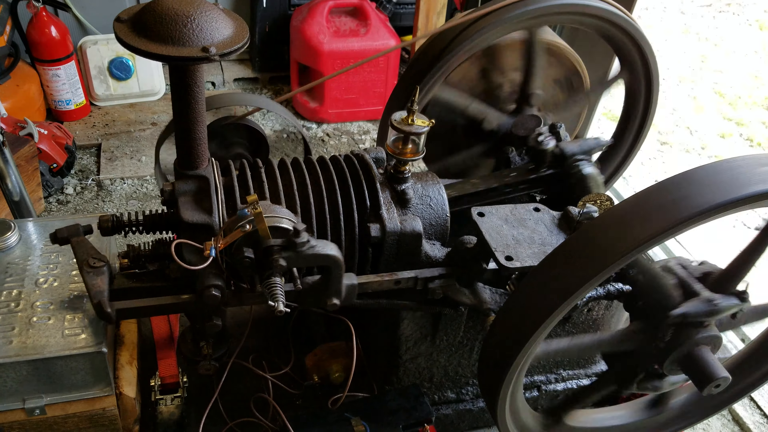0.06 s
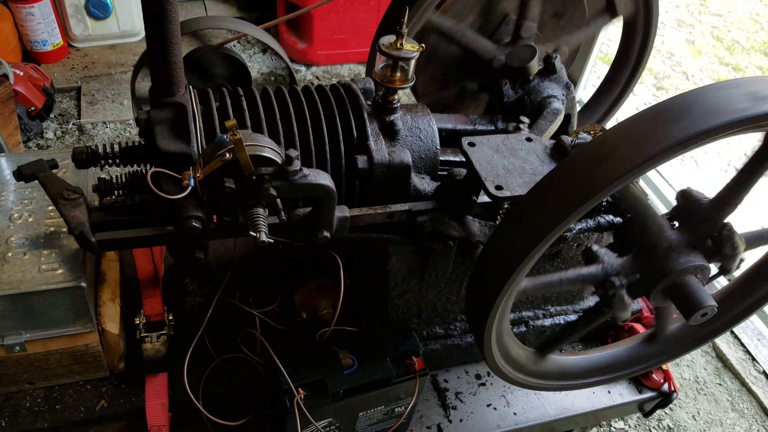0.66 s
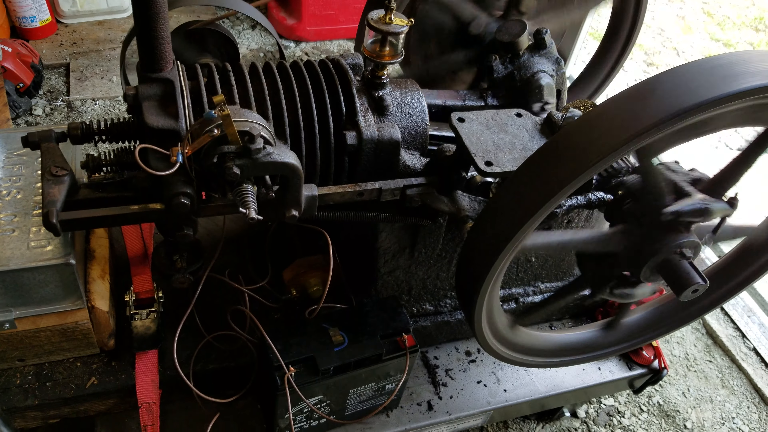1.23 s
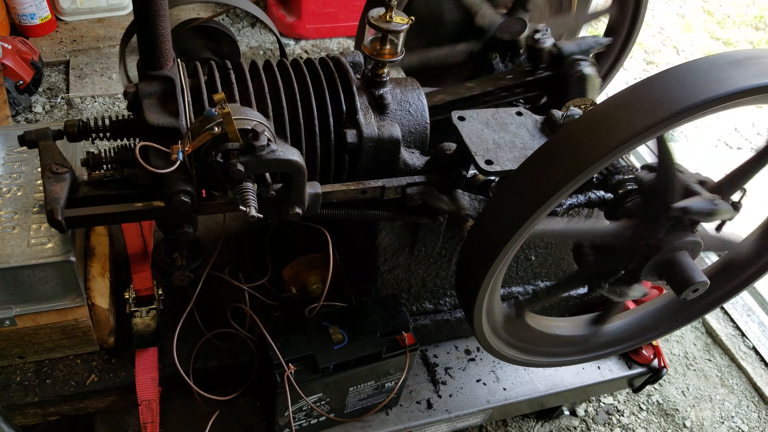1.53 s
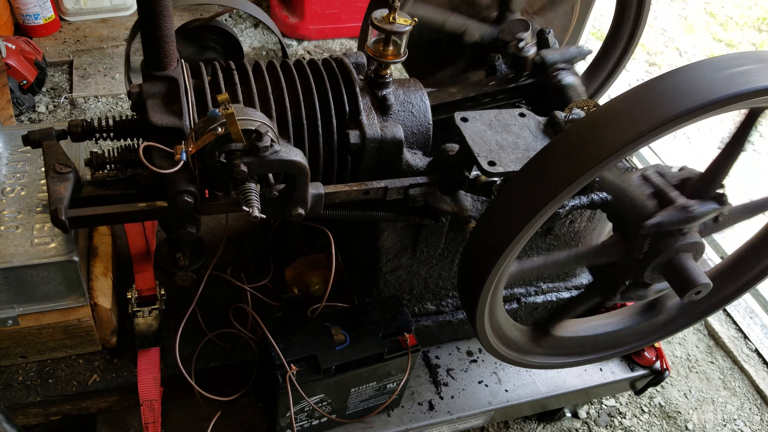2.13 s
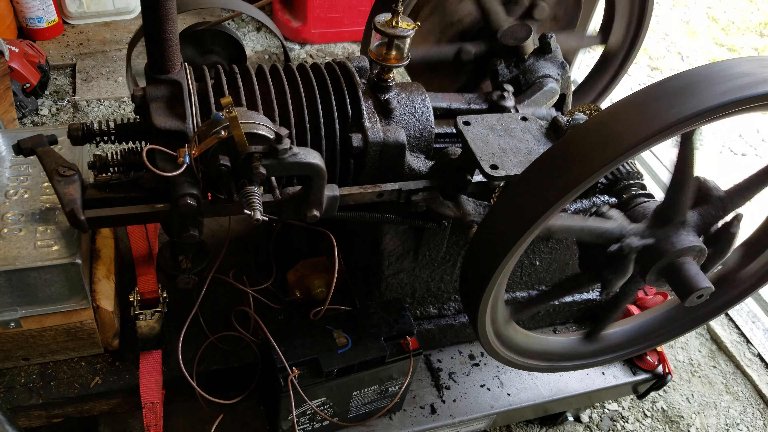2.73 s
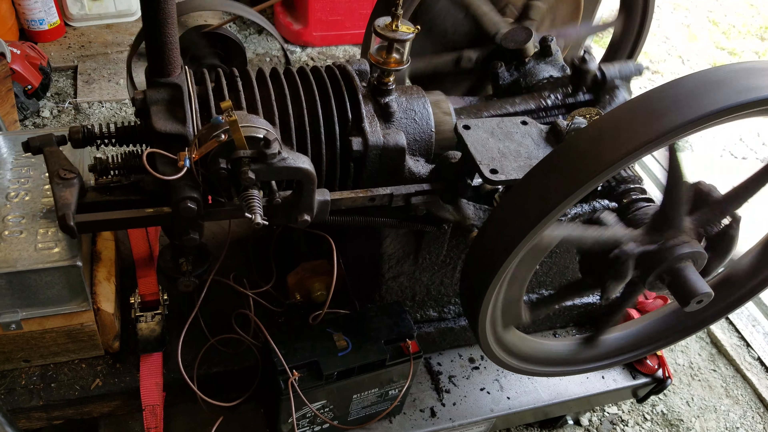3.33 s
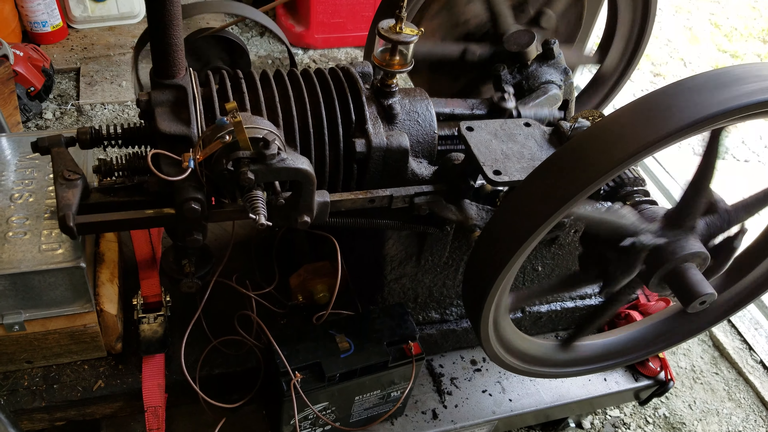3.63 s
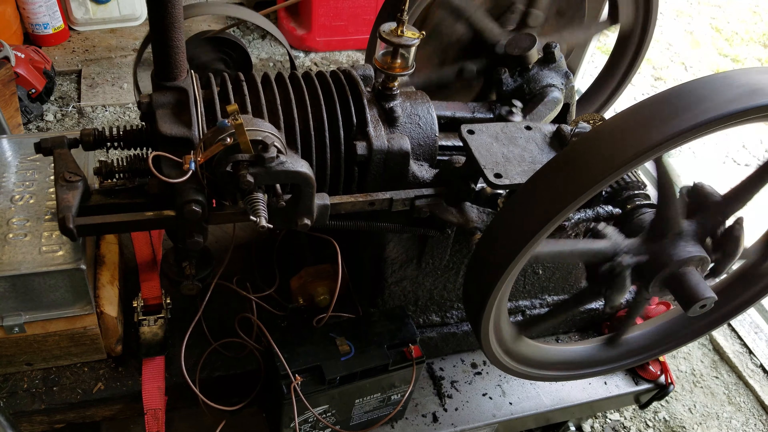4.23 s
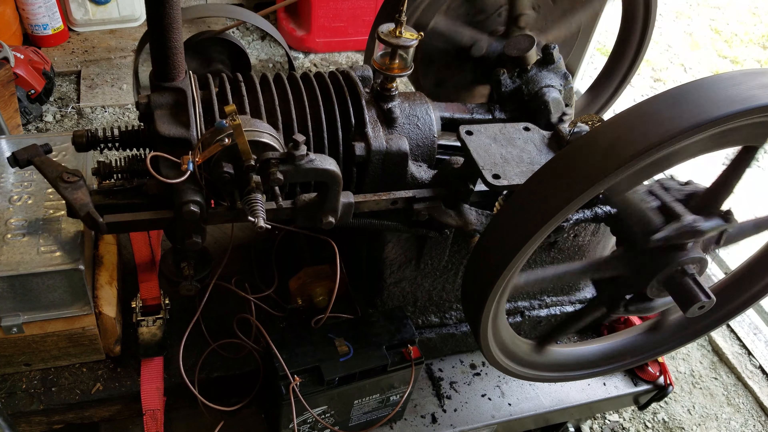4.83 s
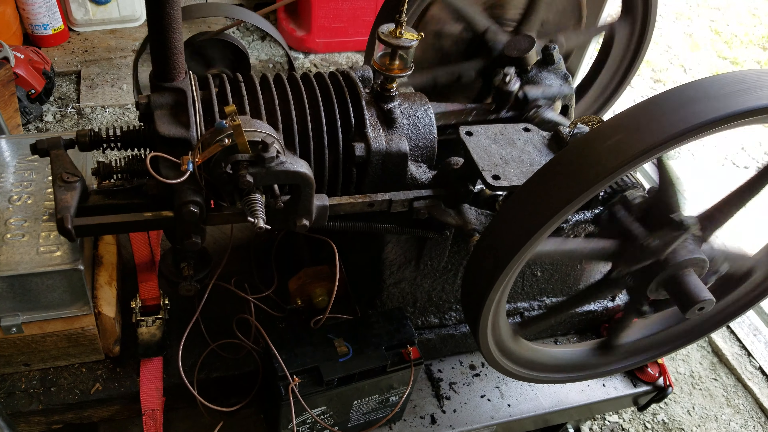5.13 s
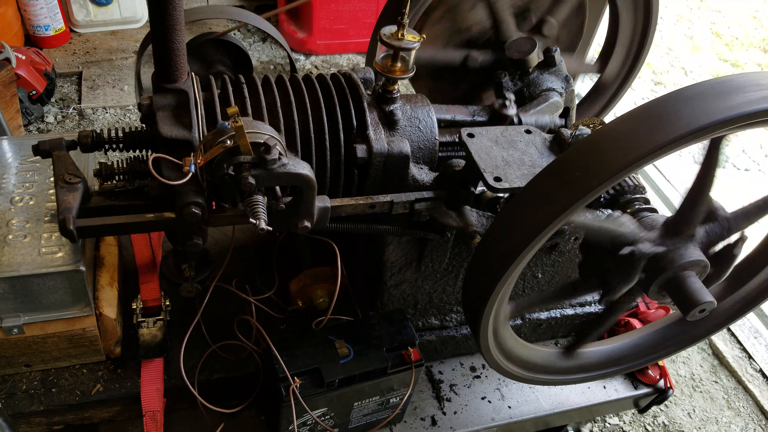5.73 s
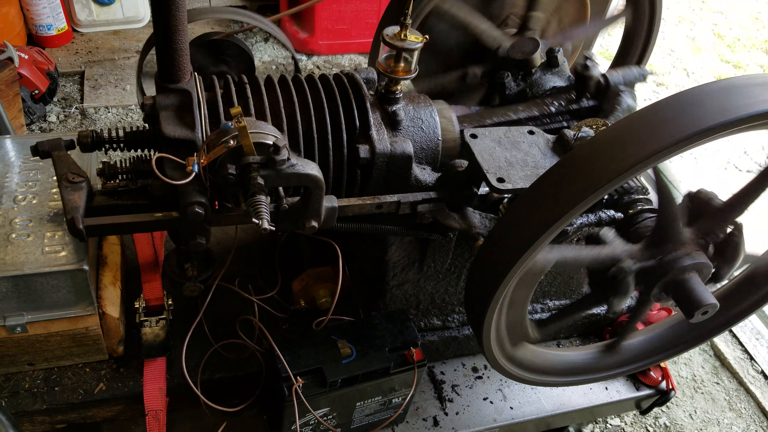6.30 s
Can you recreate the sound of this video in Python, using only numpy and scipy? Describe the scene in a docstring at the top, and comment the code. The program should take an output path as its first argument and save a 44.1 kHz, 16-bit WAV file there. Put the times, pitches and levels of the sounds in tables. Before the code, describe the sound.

Close to an old stationary engine in an open shed, a push rod clacks a little over twice a second above a low iron rumble. The intake snorts and hisses, one charge merely puffs out, then the next fires with a thump and a bark. The engine coasts with bright metal pings and small ticks, then fires three more times at shortening gaps, the clatter continuing throughout.

```python
"""A single-cylinder hit-and-miss engine in an open shed, on a stereo microphone close by.
Gears rumble from the start and the push rod clacks once every two turns. The intake valve snorts, but
the squeezed charge only puffs out; the next catches at 0.8 s, so the cylinder thumps and the pipe barks.
The engine coasts, its cam striking the latched rod, then misses and fires again at 3.3 s.
Two more snorts, near 4.7 s and 6 s, each lead to a bark, with coasting in between."""
import sys
import numpy as np
from scipy import signal
from scipy.fft import rfft, irfft, next_fast_len
from scipy.io import wavfile
from scipy.ndimage import map_coordinates

SR = 44100
rng = np.random.default_rng(int(sys.argv[2]) if len(sys.argv) > 2 else 0)


def dump_mix(stems):
    """Bounce the given channels to the path in sys.argv[1] as a 16-bit WAV at rate SR."""
    frames = np.atleast_2d(stems).T  # one column per channel
    limited = np.clip(frames, -1, 1)  # hard clip at full scale
    pcm = np.round(limited * 32767).astype(np.int16)
    wavfile.write(sys.argv[1], SR, pcm)


N = 289296
AGE = np.arange(SR // 4) / SR  # time since a blow [s]
SWELL_LEAD_S = .1


def amp(db):
    """Decibels to gain."""
    return 10 ** (np.asarray(db) / 20)


def unit(x):
    """Scaled to rms 1."""
    return x / np.sqrt(np.mean(x ** 2) + 1e-20)


def along(points, hz):
    """(frequency, value) points read on a log axis."""
    freqs, values = np.transpose(points)
    return np.interp(np.log(hz + 1), np.log(freqs + 1), values)


def wobble(rate, size=N):
    """A smooth random curve, rate knots a second."""
    knots = rng.standard_normal(int(size * rate / SR) + 4)
    return map_coordinates(knots, [np.arange(size) * rate / SR])


def filtered(x, response):
    """x shaped by a gain that depends on frequency."""
    size = x.shape[-1]
    padded = next_fast_len(size + 4096)
    return irfft(rfft(x, padded) * response(np.fft.rfftfreq(padded, 1 / SR)), padded)[..., :size]


def add(track, s, sound):
    """Mix a sound into the track at time s."""
    start = max(round(s * SR), 0)
    track[..., start:start + sound.shape[-1]] += sound[..., :N - start]


def train(times, levels_db, shape):
    """One shape repeated at each time and level."""
    out = np.zeros(N)
    for s, db in np.broadcast(times, levels_db):
        add(out, s, amp(db) * shape)
    return out


def fade(attack, t60):
    """The envelope of a blow."""
    return (1 - np.exp(-AGE / attack)) * amp(-60 * AGE / t60)


def hump(width_s):
    """A smooth swell that peaks SWELL_LEAD_S after it starts."""
    return np.exp(-((AGE - SWELL_LEAD_S) / width_s) ** 2)


def flow(times, levels_db, holds, rise, fall, sag=0):
    """Gain of an air flow that rises to each peak, sags while it holds, then falls (slopes in dB/s)."""
    out = np.zeros(N)
    for s, db, hold in np.broadcast(times, levels_db, holds):
        age = np.arange(N) / SR - s
        near = abs(age) < .35
        age = age[near]
        drop_db = sag * np.clip(age, 0, hold) + fall * np.maximum(age - hold, 0)
        out[near] += amp(db + rise * np.minimum(age, 0) - drop_db)
    return out


# how alike the microphone's two sides are: (frequency [Hz], correlation [0-1])
LIKENESS = [(100, 0.9), (280, 0.9), (500, 0.93), (1000, 0.1), (4000, 0), (14000, 0.07)]
def spread(hz):
    """The angle that sets left and right apart: small in the bass, wide in the treble."""
    return np.arccos(along(LIKENESS, hz)) / 2


def rush(spectrum, resonances=(), ripple_db=3.6):
    """Stereo noise of rms 1, lifted at resonances; close modes and shed echoes ripple each side."""
    def gain(hz):
        lift = sum(db / (1 + (2 * (hz - centre) / width) ** 2) for centre, width, db in resonances)
        return amp(along(spectrum, hz) + lift) * [np.cos(spread(hz)), np.sin(spread(hz))]

    def ripple(hz):
        grid = np.arange(0, SR / 2, 55)
        depth = ripple_db * np.minimum(grid / 2500, 1)
        return amp([np.interp(hz, grid, depth * rng.standard_normal(len(grid))) for side in "LR"])
    mid, side = filtered(rng.standard_normal((2, N)), gain)
    return unit(filtered(np.array([mid + side, mid - side]), ripple))


def ring(times, levels_db, modes, attack, waver_rad=.55):
    """Modes struck at new strengths by each blow; high ones reach the two sides out of step."""
    out = np.zeros((2, N))
    for s, blow_db in zip(times, levels_db):
        for hz, db, t60 in modes:
            chance_db = 1.2 * rng.standard_normal()
            apart = spread(hz) * rng.choice([-1, 1]) * np.array([[1], [-1]])
            phase = 2 * np.pi * hz * AGE + apart + waver_rad * wobble(90, size=len(AGE))
            add(out, s, amp(blow_db + db + chance_db) * fade(attack, t60) * np.sin(phase))
    return out


# how loudly gears and bearings run: (time [s], level [dB])
RUNNING_LEVEL = [(0.0, -29), (0.2, -33.5), (0.77, -34.5), (0.86, -31.5), (1.31, -33), (1.42, -33),
                 (1.94, -34.5), (2.56, -23.5), (2.79, -35.5), (2.98, -30.5), (3.07, -34), (3.84, -34.5),
                 (4.55, -35), (4.8, -29.5), (4.93, -35), (5.24, -36), (6.21, -39), (6.56, -34)]
def running_db(times):
    """The running level at these moments."""
    return np.interp(times, *np.transpose(RUNNING_LEVEL))


# spectra of the low rumble and the gear teeth: (frequency [Hz], level [dB])
RUMBLE_SPECTRUM = [(20, -46), (60, -18), (110, -22.5), (150, -13.5), (200, 2), (300, -8.5), (470, -6),
                   (600, -28), (1000, -50.5)]
TEETH_SPECTRUM = [(260, -11.5), (450, -14), (660, -2), (1150, -2.5), (1800, -7.5), (2500, -6.5),
                  (3500, -20.5), (4900, -13.5), (7200, -20), (8700, -29), (12000, -30.5), (16000, -35)]
# resonances of the iron casting: (frequency [Hz], width [Hz], lift [dB])
IRON = [(221.7, 13.6, 12.5), (276, 12, 8), (368.6, 13.5, 14), (456.5, 65, 6.5), (645.5, 8.5, 11.5),
        (1250, 48, 4.5), (1327, 16, 4.5), (2390, 24, 5.5), (4970, 350, 1.5)]
def gears():
    """Meshing teeth and sliding bearings keep the casting rumbling and rasping."""
    rumble = amp(-2.5 + 2 * wobble(25)) * rush(RUMBLE_SPECTRUM, IRON)
    roughness = unit(amp(3 * wobble(30) + 0.88 * wobble(350)))
    teeth = amp(-4) * roughness * rush(TEETH_SPECTRUM, IRON)
    return amp(running_db(np.arange(N) / SR)) * (rumble + teeth)


# spectra of a steel click and the linkage's clang: (frequency [Hz], level [dB])
CLICK_SPECTRUM = [(500, -49), (2500, -27), (5500, 16.5), (8500, 1.5), (11500, 6.5), (16000, 2)]
LINKAGE_SPECTRUM = [(200, -17), (450, 2), (800, 4), (1350, 6.5), (1700, 3), (2400, 5.5), (3300, 1.5),
                    (5800, 2), (7000, -2.5), (8500, -13), (11000, -7), (16000, -22)]
def clack(s, click_db, clang_db):
    """Steel on steel: a hard click and a clang of the linkage."""
    click = train(s, click_db - 9, fade(attack=0.00022, t60=0.026)) * rush(CLICK_SPECTRUM)
    clang_gain = train(s, clang_db + 0.5, fade(attack=0.0013, t60=0.2))
    return click + clang_gain * rush(LINKAGE_SPECTRUM, ripple_db=2.5)


# the push rod drops back, once every two turns: (time [s], click level [dB], clang level [dB])
ROD_DROPS = [(0.0004, -0.5, -16), (0.4584, -1.5, -15), (0.9107, -27, -20), (1.29, -10.5, -21),
             (1.6886, -10, -21), (2.098, -2.5, -17), (2.5262, -2, -13.5), (2.9882, -3, -15.5),
             (3.4492, -25, -20.5), (3.844, -17, -21.5), (4.2567, -7, -22.5), (4.6851, -1, -15),
             (5.1217, -27, -24), (5.532, -10, -23.5), (5.9583, -9, -21), (6.3827, -21, -25)]
# modes of the rod and the frame: (frequency [Hz], level [dB], t60 [s])
ROD_MODES = [(653.5, 2, 0.11), (898, -8.5, 0.26), (1020, -7, .1), (1330, -2, 0.15), (1358, 2, 0.22),
             (1770, -18, 0.15), (4370, -3, 0.17)]
FRAME_MODES = [(227.3, -2, 0.13), (287, -8.5, 0.2), (371.7, -1, 0.22), (452, -6.5, 0.11)]
def push_rod():
    """Each drop clacks and thuds the frame; hard ones also ring the rod."""
    s, click_db, clang_db = np.transpose(ROD_DROPS)
    rod = ring(s, 4 + 1.62 * clang_db, ROD_MODES, attack=0.0024)
    thud = ring(s, clang_db, FRAME_MODES, attack=0.0029, waver_rad=0.49)
    return clack(s, click_db, clang_db) + rod + thud


# the intake valve snorts: (time [s], level [dB], pitch [Hz], click level [dB])
VALVE_SNORTS = [(0.045, -10.5, 292, -4), (2.575, -9.5, 291, -2), (4.719, -12.5, 284, -6),
                (5.988, -19, 308, -7.5)]
def intake_valve():
    """The valve flutters on its spring, then hits its stop."""
    flutter = np.zeros(N)
    swell = (1 - np.exp(-AGE / 0.00072)) * np.exp(-(AGE / 0.017) ** 3)
    for s, db, hz, _ in VALVE_SNORTS:
        phase = 2 * np.pi * hz * AGE + 0.4 * wobble(120, size=len(AGE))
        buzz = np.sin(phase) + amp(-24) * np.sin(2 * phase) + amp(-18) * np.sin(3 * phase)
        add(flutter, s, amp(db + 0.5) * swell * buzz)
    s, db, _, click_db = np.transpose(VALVE_SNORTS)
    return flutter + clack(s + .031, click_db, clang_db=db - 3.5)


# spectrum of air in an oily gap: (frequency [Hz], level [dB])
FIZZ_SPECTRUM = [(3000, -25), (6000, -6), (7300, 2.5), (8600, -2), (11000, 1), (14000, 0.5), (16000, -3.5)]
def fizz():
    """Air spits through an oily gap in tiny bursts."""
    return rush(FIZZ_SPECTRUM, ripple_db=2) * unit(amp(2.2 * wobble(900) + 2.2 * wobble(110)))


# suction strokes: (time of full flow [s], hold [s], rasp level [dB], fizz level [dB])
SUCTION_STROKES = [(0.077, 0.049, -19, -28.5), (0.523, 0.08, -22, -29.5), (2.606, 0.056, -18, -28.5),
                   (3.052, .085, -24, -30.5), (4.754, 0.058, -20, -29), (6.021, 0.057, -26.5, -34.5)]
# spectrum of air in the mixer: (frequency [Hz], level [dB])
MIXER_SPECTRUM = [(22, -47), (45, -8), (115, -22), (200, -3), (310, -4.5), (430, -3), (700, -11),
                  (1100, -6), (1500, -10.5), (2600, -6.5), (4300, -6), (6000, -7.5), (8300, -29),
                  (16000, -36)]
# resonances of its throat: (frequency [Hz], width [Hz], lift [dB])
MIXER_THROAT = [(219, 38, 7.8), (281, 18, 16.7), (369.5, 6.4, 19), (660, 45, 3.1), (1260, 59, 5.5),
                (1730, 68, 6.3), (2400, 300, 3.3), (4370, 120, 3.3), (5900, 170, 5), (6230, 77, 3.8)]
def suction():
    """Air drawn through the mixer fizzes first, then rasps."""
    s, hold, rasp_db, fizz_db = np.transpose(SUCTION_STROKES)
    lead_s = 0.016
    fizz_gain = flow(s - lead_s, fizz_db + 1.5, hold + lead_s, rise=475, fall=335)
    rasp_gain = flow(s, rasp_db + 3.5, hold, rise=475, fall=335, sag=61)
    rasp = rush(MIXER_SPECTRUM, MIXER_THROAT, ripple_db=2.5) * unit(amp(1.4 * wobble(700) + wobble(120)))
    return rasp_gain * rasp + fizz_gain * fizz()


# sharp ticks of the governor and valve gear: (time [s], level [dB])
SHARP_TICKS = [(0.1224, -20), (0.2498, -23), (0.3227, -20), (0.3461, -12), (0.5247, -10), (0.684, -27),
               (1.557, -22.5), (1.8118, -18.5), (2.0727, -19.5), (2.34, -19), (2.8524, -18), (3.0565, -9.5),
               (3.2116, -14), (3.7354, -21), (4.52, -18.5), (5.5932, -20.5)]
# spectrum of small loose parts: (frequency [Hz], level [dB])
TINKLE_SPECTRUM = [(500, -22), (2000, -3), (4500, -1.5), (7000, 4), (8500, -9.5), (12000, -1),
                   (16000, -0.5)]
def clatter(faint_per_s=2, faint_db=-29):
    """Loose small parts tick, some sharply and others faintly at random."""
    faint = [(s, faint_db) for s in rng.uniform(0, N / SR, round(faint_per_s * N / SR))]
    s, db = np.transpose(list(SHARP_TICKS) + faint)
    click = train(s, db - 9, fade(attack=.0002, t60=.009)) * rush(CLICK_SPECTRUM)
    steel = rush(TINKLE_SPECTRUM, ripple_db=3.5)
    return click + train(s, db - 10.5, fade(attack=0.00077, t60=0.19)) * steel


# compression peaks: (time [s], rasp level [dB], fizz level [dB])
COMPRESSIONS = [(0.258, -24.5, -30.5), (0.738, -25.5, -30.5), (2.785, -24, -31.5), (3.277, -25.5, -31),
                (4.942, -26, -31.5), (6.214, -31.5, -35.5)]
# spectrum of gas passing the rings: (frequency [Hz], level [dB])
LEAK_SPECTRUM = [(70, -39), (120, -21), (240, -2.5), (570, -13), (1200, -10), (1800, -12), (2800, -12),
                 (4900, -11), (7200, -21), (9000, -25), (16000, -55)]
def gas_leak():
    """Gas hisses past the rings when squeezed or burning, and out of the exhaust after a miss."""
    peaks = [(s, 0, rasp_db, fizz_db) for s, rasp_db, fizz_db, *_ in list(COMPRESSIONS) + list(MISSES)]
    peaks += [(s + .02, 0.016, db - 17.5, db - 40) for s, db in IGNITIONS]
    s, hold, rasp_db, fizz_db = np.transpose(peaks)
    rasp = rush(LEAK_SPECTRUM, IRON, ripple_db=3.2) * unit(amp(1.05 * wobble(500)))
    rasp_gain = flow(s, rasp_db + 4.5, hold, rise=492, fall=285)
    fizz_gain = flow(s, fizz_db + 3, hold, rise=492, fall=285)
    return rasp_gain * rasp + fizz_gain * fizz()


def before_cam(turns):
    """The times so many crank turns before each cam strike; rod drops are two turns apart."""
    drop_s = np.transpose(ROD_DROPS)[0]
    drop_turns = 2 * np.arange(len(drop_s))
    strike_turns = np.interp(np.transpose(CAM_STRIKES)[0], drop_s, drop_turns)
    return np.interp(strike_turns - turns, drop_turns, drop_s)


# the bearings knock under load: (time [s], level [dB])
LOAD_KNOCKS = [(0.343, -17), (0.564, -14), (0.739, -24), (3.09, -12), (3.27, -14)]
def bearings():
    """Bearing play knocks the frame at one crank angle of each coasting cycle, and harder under load."""
    knock = fade(attack=0.0011, t60=0.13)
    coast_s = before_cam(turns=.626)
    coasting = train(coast_s, running_db(coast_s) + 3, knock)
    load_s, load_db = np.transpose(LOAD_KNOCKS)
    loaded = train(load_s, load_db - 10.5, knock)
    return (coasting + loaded) * rush(RUMBLE_SPECTRUM, IRON)


# charges that do not catch: (time [s], rasp level [dB], fizz level [dB], thump level [dB])
MISSES = [(0.352, -28.5, -33.5, -22), (2.88, -28, -26.5, -23)]
def misfires(thump_hz=286.3):
    """An unburnt charge leaves the pipe with a soft, hollow thump."""
    s, _, _, thump_db = np.transpose(MISSES)
    tone = np.sin(2 * np.pi * thump_hz * AGE + 0.51 * wobble(144, size=len(AGE)))
    return train(s - SWELL_LEAD_S, thump_db, hump(width_s=0.013) * tone)


# coasting rubs, over the running level: (lead on the cam [turns], swish level [dB], squeak level [dB])
PISTON_RUBS = [(0.66, 1.5, -4.5), (0.2, -6.5, -8.5)]
# spectra of the piston's swish and the rings' squeak: (frequency [Hz], level [dB])
SWISH_SPECTRUM = [(200, -9), (450, -6.5), (700, 6), (1200, 5), (1700, -3.5), (2400, -3), (3300, -6.5),
                  (6000, -40), (16000, -34)]
SQUEAK_SPECTRUM = [(2000, -10), (3900, -29), (4600, -3.5), (5200, -3), (6000, -12), (9000, -18),
                   (16000, -20)]
def piston():
    """The piston swishes along its bore after each miss, and at set crank angles with squeaking rings."""
    swell = hump(width_s=0.03)
    sweep_s = np.transpose(MISSES)[0] + 0.093
    swish = train(sweep_s - SWELL_LEAD_S, -31.5, swell)
    squeak = np.zeros(N)
    for turns, swish_db, squeak_db in PISTON_RUBS:
        s = before_cam(turns)
        swish += train(s - SWELL_LEAD_S, running_db(s) + swish_db, swell)
        squeak += train(s - SWELL_LEAD_S, running_db(s) + squeak_db, swell)
    rubbing = swish * rush(SWISH_SPECTRUM, IRON) + squeak * rush(SQUEAK_SPECTRUM)
    return rubbing * unit(amp(2.2 * wobble(300)))


# the intake valve rattles: (time of peak [s], level [dB])
VALVE_RATTLES = [(0.495, -16), (3.02, -17)]
# spectrum of that rattle: (frequency [Hz], level [dB])
RATTLE_SPECTRUM = [(200, -12), (450, 0), (900, -5), (1400, -3.5), (2600, 0), (4500, -4), (6000, -5),
                   (8300, -19), (16000, -30)]
def valve_rattle():
    """On a second suction in a row the valve only chatters on its seat, a short, coarse rasp."""
    s, db = np.transpose(VALVE_RATTLES)
    rasp = rush(RATTLE_SPECTRUM, ripple_db=3) * unit(amp(1.6 * wobble(450)))
    return train(s - SWELL_LEAD_S, db, hump(width_s=0.018)) * rasp


# combustion shakes the cylinder: (time [s], level [dB])
IGNITIONS = [(0.766, -4), (3.303, -7), (6.254, -17)]
# modes of the cylinder: (frequency [Hz], level [dB], t60 [s])
CYLINDER_MODES = [(181, -5.5, 0.27), (225.4, -10, 0.35), (282, -6.5, 0.26), (388, -5, 0.071),
                  (449, -7.5, 0.088), (606, -8, 0.065)]
def combustion(boom_hz=218):
    """The charge burns with a short boom that leaves the iron ringing."""
    s, db = np.transpose(IGNITIONS)
    boom = np.exp(-((AGE - .0105) / 0.0063) ** 2) * np.sin(2 * np.pi * boom_hz * AGE)
    iron = ring(s + 0.01426, db - 2, CYLINDER_MODES, attack=0.0023, waver_rad=0.09)
    return train(s, db - .3, boom) + iron


# the exhaust valve opens: (time [s], bark level [dB], pulse level [dB])
EXHAUST_BARKS = [(0.825, -5, -19), (3.357, -4.5, -17), (5.029, -4.5, -18.5), (6.294, -6.5, -17.5)]
# spectrum of the gas jet: (frequency [Hz], level [dB])
JET_SPECTRUM = [(22, -30), (45, -5), (120, -11), (220, -9), (330, 0.5), (550, -11.5), (800, -5.5),
                (1220, -6), (1750, -5.5), (2500, -8.5), (4200, -9.5), (6500, -8), (9000, -14),
                (11700, -8.5), (16000, -9)]
# resonances of the pipe: (frequency [Hz], width [Hz], lift [dB])
EXHAUST_PIPE = [(130, 41, 2.8), (366, 54, 4.8), (1014, 43, 6.9), (1200, 340, 8.8), (1440, 76, 7),
                (1570, 99, 2.9), (2155, 140, 8.9), (2900, 71, 5.6), (4250, 90, 5.4), (4860, 150, 6.1),
                (6480, 170, 7), (7660, 83, 14)]
# modes of its mouth: (frequency [Hz], level [dB], t60 [s])
MOUTH_MODES = [(983, -5.5, 0.22), (1190, 3.5, 0.073), (1282, 1, 0.2), (1420, -13, 0.11), (1640, -10, 0.17)]
def exhaust():
    """One pressure pulse rings the pipe, a jet follows, and the gas column's note rises."""
    s, db, pulse_db = np.transpose(EXHAUST_BARKS)
    lead_s = .004
    pulse_time = (AGE - lead_s) / 0.00089
    pulse = train(s - lead_s, pulse_db + 15, -pulse_time * np.exp(-pulse_time ** 2))
    # the jet holds its strength until the cylinder pressure is spent
    blowdown = (1 - np.exp(-AGE / .002)) * (np.exp(-(AGE / 0.055) ** 3) + amp(-12 - 60 * AGE / 0.53))
    gas = rush(JET_SPECTRUM, EXHAUST_PIPE, ripple_db=1.5) * unit(amp(1.7 * wobble(500)))
    jet = train(s, db - 10, blowdown) * gas
    column_hz = np.interp(AGE, [.028, .11], [112, 205])
    note = fade(attack=0.032, t60=0.47) * np.sin(2 * np.pi * np.cumsum(column_hz) / SR)
    column = train(s, db - 16, note) * amp(4.3 * wobble(90))
    return pulse + jet + column + ring(s, db - 10.5, MOUTH_MODES, attack=0.00067)


# the cam strikes while the engine coasts: (time [s], clang level [dB], ping level [dB])
CAM_STRIKES = [(1.2086, -24, -27), (1.6018, -24, -29), (2.0115, -22, -25.5), (2.4337, -19.5, -21.5),
               (3.7595, -25.5, -31.5), (4.1674, -25, -28), (4.594, -21.5, -34.5), (5.445, -26, -32.5),
               (5.8671, -27.5, -32.5)]
# spectra of its snap and clang: (frequency [Hz], level [dB])
SNAP_SPECTRUM = [(500, -41), (2000, 3), (4500, 3.5), (7000, 5), (8500, -6.5), (12000, -2.5), (16000, -6)]
CAM_SPECTRUM = [(100, -39), (200, 5), (500, 3.5), (1000, 6.5), (2400, 4), (3700, -2), (5600, -2),
                (7000, -14), (8500, -17.5), (12000, -22), (16000, -35)]
# modes of the follower: (frequency [Hz], level [dB], t60 [s])
FOLLOWER_MODES = [(1250, -12, .2), (2195, -8.5, 0.32), (2440, -3, 0.16), (2464, -9, 0.12),
                  (2820, -13, 0.16), (5400, 2.5, 0.099), (5504, 3, 0.092), (5760, -0.5, 0.045)]
def cam():
    """The cam slides up to the latched push rod's follower and strikes it with a bright steel ring."""
    s, clang_db, ping_db = np.transpose(CAM_STRIKES)
    lead_s = .03
    slide = train(s - lead_s, clang_db - 8.5, np.exp(-((AGE - lead_s) / 0.0091) ** 2))
    snap = train(s, clang_db - 4.5, fade(attack=0.00055, t60=0.076)) * rush(SNAP_SPECTRUM)
    strike = train(s, clang_db + 2.5, fade(attack=0.003, t60=0.32))
    clang = (slide + strike) * rush(CAM_SPECTRUM, IRON)
    return snap + clang + ring(s, ping_db + 4.5, FOLLOWER_MODES, attack=0.00043)


# how long the shed echoes: (frequency [Hz], t60 [s])
SHED_DECAY = [(100, .25), (500, 0.4), (3000, 0.33), (8000, 0.089), (16000, 0.14)]
def shed(x):
    """A short echo from walls and roof; the bass escapes through the door."""
    hz, t, noise = signal.stft(rng.standard_normal((2, SR // 2)), SR, nperseg=256)
    decay = amp(-60 * t / along(SHED_DECAY, hz)[:, None]) * np.minimum(hz / 1200, 1)[:, None]
    tail = signal.istft(noise * decay * (1 - np.exp(-t / 0.0052)), SR, nperseg=256)[1]
    return signal.fftconvolve(x, tail / np.linalg.norm(tail[0]), axes=1)[:, :N]


# balance at the microphone: (frequency [Hz], left minus right [dB])
BALANCE = [(60, 2), (250, -1.5), (1200, -1.5), (2500, -3), (4500, -6), (6300, -5), (8000, 3), (14000, 1.5)]
def scene():
    """The engine close up, the shed's echo well behind it; the hiss leans right, its very top left."""
    machinery = gears() + push_rod() + clatter() + bearings() + piston() + cam()
    intake = intake_valve() + suction() + valve_rattle()
    engine = machinery + intake + gas_leak() + misfires() + combustion() + exhaust()
    heard = engine + amp(-14) * shed(engine)
    return filtered(heard, lambda hz: amp(along(BALANCE, hz) * np.array([[.5], [-.5]])))


def record(dry):
    """The microphone's signal clips at full scale and loses everything above 15950 Hz."""
    return filtered(np.clip(dry, -1, 1), lambda hz: hz < 15950)


dry = scene()
out = record(dry)
dump_mix(out)
```